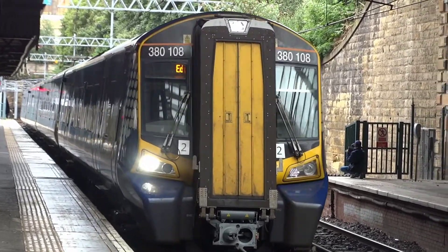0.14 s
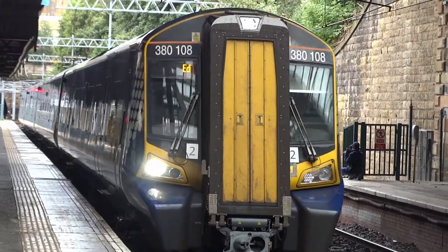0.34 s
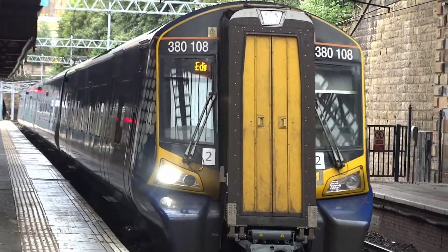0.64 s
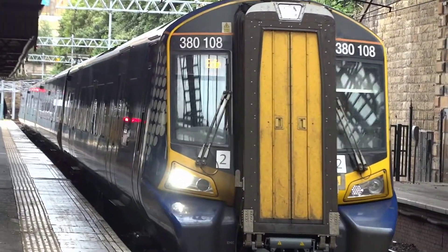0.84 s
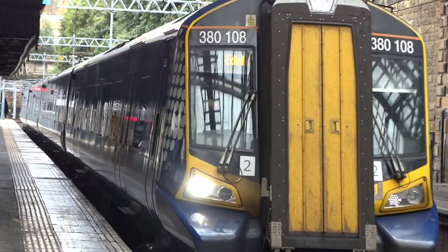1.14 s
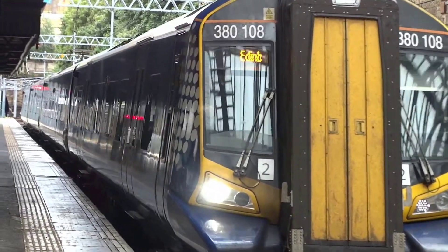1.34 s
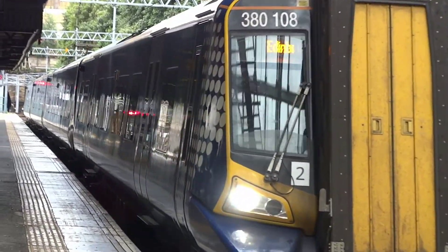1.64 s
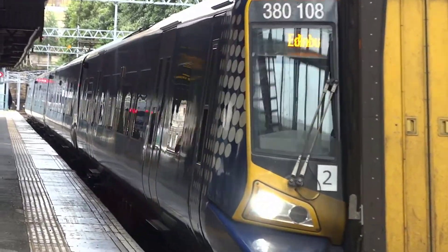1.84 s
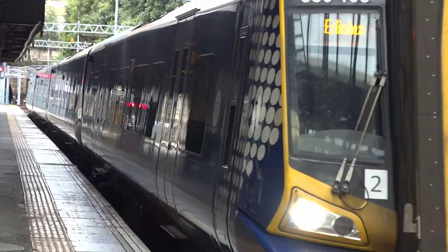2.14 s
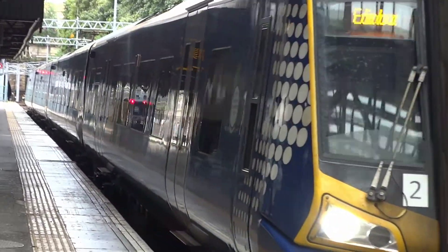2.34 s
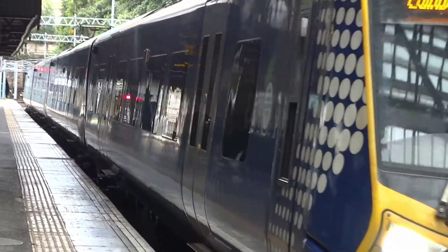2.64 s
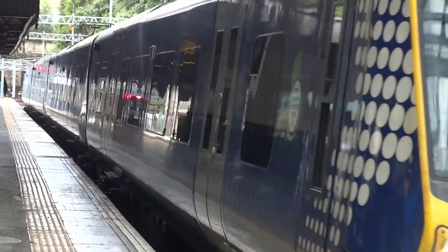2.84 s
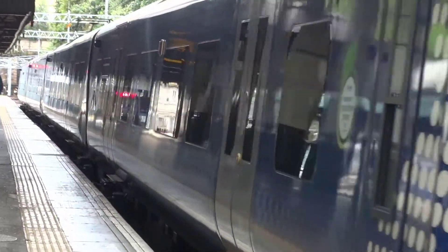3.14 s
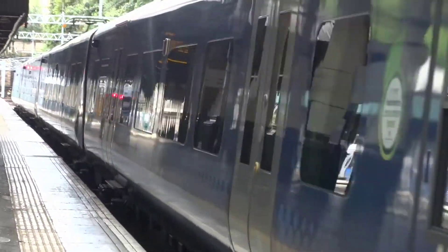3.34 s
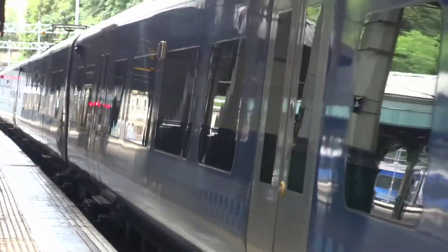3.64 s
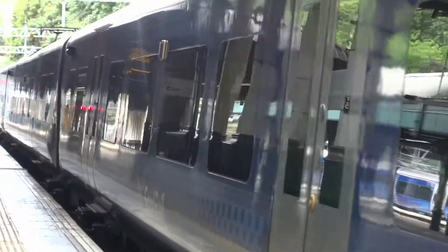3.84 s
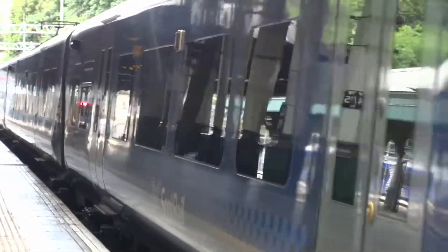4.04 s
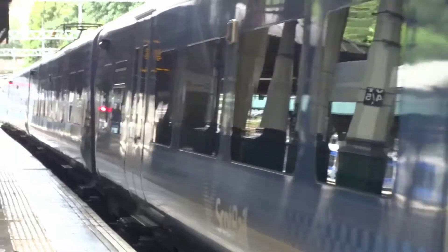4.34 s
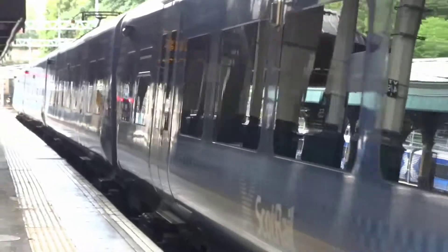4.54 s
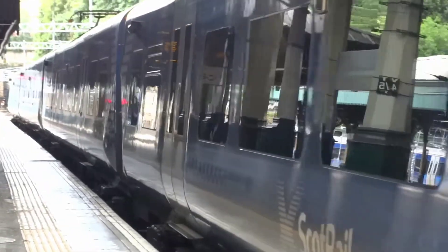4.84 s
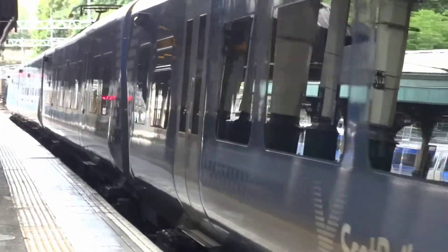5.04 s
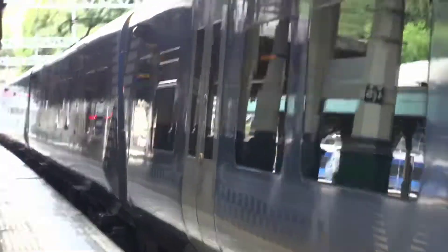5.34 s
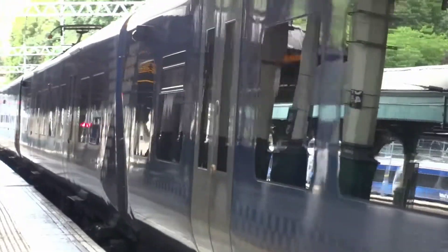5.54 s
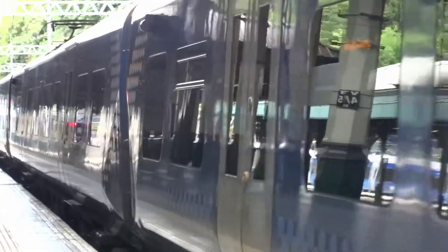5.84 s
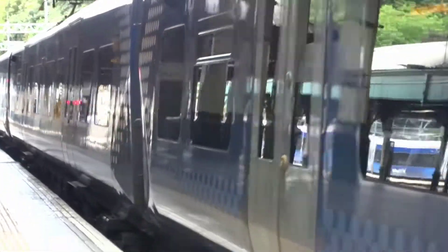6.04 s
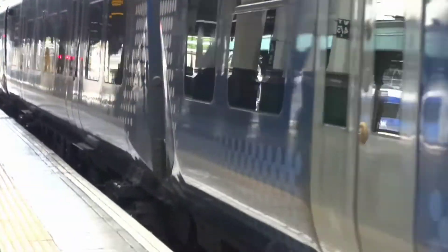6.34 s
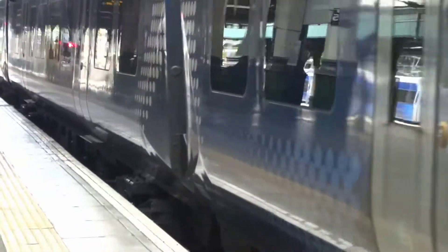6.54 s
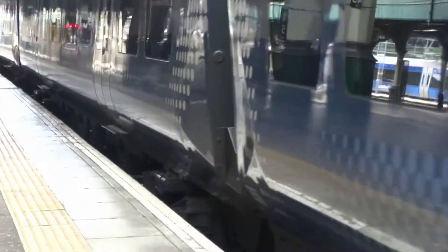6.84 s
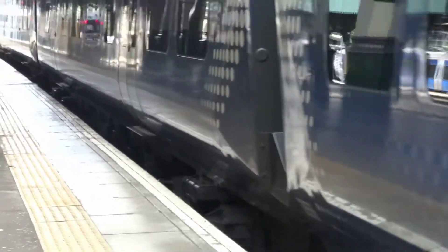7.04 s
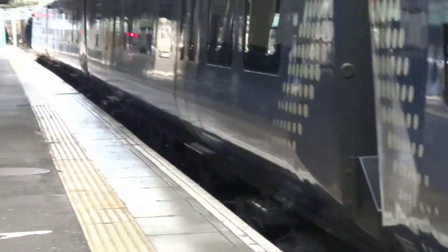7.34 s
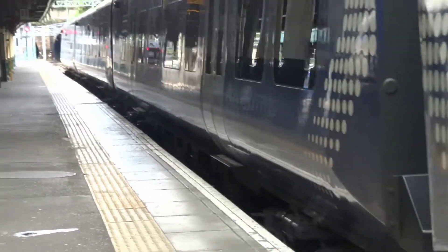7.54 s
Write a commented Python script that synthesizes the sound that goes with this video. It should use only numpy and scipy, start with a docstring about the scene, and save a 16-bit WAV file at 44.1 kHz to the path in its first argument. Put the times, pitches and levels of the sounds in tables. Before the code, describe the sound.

An electric train rolls slowly past close by, wheels roaring and hissing, with a fading electrical whine, sharp air bursts and wheel thuds on rail joints.

```python
"""An electric train rolls slowly past, close by: its wheels roar and hiss on the rails, made from coloured noise.
The converter under the leading car whines and fades; gears and motors sing, as bands of noise and blurred tones.
Brake valves vent bursts of noise, and wheels thud on rail joints as short rings; fans hum and faint treble flickers.
An automatic gain control turns loud moments down and partly creeps back."""
import sys
import numpy as np
from scipy import signal
from scipy.fft import rfft, irfft, next_fast_len
from scipy.io import wavfile
from scipy.ndimage import uniform_filter1d, map_coordinates

SR = 44100
rng = np.random.default_rng(int(sys.argv[2]) if len(sys.argv) > 2 else 0)


def unload_audio(sound):
    """Save the sound as a 16-bit wav file, at the path given as the first command line argument."""
    columns = np.transpose(np.atleast_2d(sound))
    # keep every value between -1 and 1, then stretch to whole-number steps
    steps = np.round(np.clip(columns, -1, 1) * 32767)
    wavfile.write(sys.argv[1], SR, steps.astype(np.int16))


N = 339129  # length in samples

# All levels are those before the gain control in record().
# rolling noise as cars and bogies go by: t/s, wheel rumble level/dB, rail hiss level/dB
ROLLING_LEVELS = [(0, -19.5, -17.5), (.6, -21.5, -17.5), (1.1, -22.5, -18.5), (1.4, -17.5, -15.5),
                  (1.5, -17.5, -13), (1.7, -22.5, -15.5), (2.1, -20.5, -13.5), (2.8, -19.5, -16),
                  (3.5, -19, -15), (4.2, -16, -17.5), (4.65, -15.5, -16.5), (4.85, -13.5, -17.5),
                  (5.05, -18.5, -19), (5.6, -20.5, -20.5), (6.4, -21, -20.5), (6.9, -17, -19),
                  (7.3, -17, -17.5), (7.69, -15, -17)]


def rolling():
    """Rough rails shake the wheels and car body into a low rumble, and the rails into a hiss."""
    # wheels and car body: f/Hz, relative level/dB
    rumble_colour = [(18, -46), (35, -6), (60, -5.5), (140, -4.5), (200, -0.5), (340, -0.5), (470, -3.5),
                     (530, -10.5), (800, -7.5), (1300, -26), (2500, -120)]
    # rails: f/Hz, relative level/dB
    hiss_colour = [(300, -23.5), (500, -4.5), (900, -1), (1400, -3.5), (1600, -8), (2400, -13),
                   (3200, -16.5), (4200, -16.5), (4700, -19.5), (6800, -21), (7100, -73), (7600, -120)]
    # the rumble's strongest notes: f/Hz, width/Hz, relative level/dB
    drone_notes = [(256, 61, 3), (348, 82, 1.5)]
    # how strong those notes are: t/s, level/dB
    drone_level = [(1.6, -36), (2.2, -24), (2.9, -32), (3.6, -20), (4, -30), (4.4, -25), (4.8, -29),
                   (5.1, -27), (5.9, -19.5), (6.5, -25), (7.69, -22)]
    sway_db, surge_db = 0.55, 1.3
    rumble_db, hiss_db = curves(ROLLING_LEVELS)
    sway = sway_db * wobble(5)  # the wheel load varies, in rumble and hiss alike
    surge = surge_db * wobble(16)  # uneven swells of the rumble alone
    rumble = amp(rumble_db + sway + surge) * rush(coloured(rumble_colour), patchy_db=1.0)
    drone = amp(curves(drone_level)[0]) * rush(bands(drone_notes), patchy_db=2.0)
    hiss = amp(hiss_db + sway) * rush(coloured(hiss_colour), patchy_db=0.85)
    return rumble + drone + hiss


def converter():
    """The converter roars and whines in narrow bands of noise while its fan blows air."""
    # roar: f/Hz, width/Hz, relative level/dB
    roar_bands = [(240, 147, 2), (616, 110, -4.5), (4050, 480, -14)]
    # close-set strands of the whine: f/Hz, width/Hz, relative level/dB
    whine_bands = [(1275, 36, -6), (1298, 47, -6), (1358, 120, -4.5)]
    # upper band: f/Hz, width/Hz, relative level/dB
    overtone_bands = [(2625, 190, -5), (2838, 270, 1.5)]
    # air through the fan: f/Hz, relative level/dB
    cooling_colour = [(4300, -30), (4800, -1), (6000, -3), (7000, 4), (7600, -28), (7800, -60)]
    steady_db, passed_s, recede_db_per_s = -19.5, 3.33, 13.5  # fades once its car has passed
    cooling_db, whine_db, overtone_db = -14.5, -1.5, -7  # over the roar
    whine_grows_db_per_s = 0.08
    overtone_lag_s = 0.08  # the upper band starts to fade a little later
    beat_hz, beat_depth_db = 27, 1.3
    t = clock()
    roar_db = steady_db - recede_db_per_s * np.maximum(t - passed_s, 0)
    roar = amp(roar_db) * rush(bands(roar_bands), patchy_db=1.0)
    cooling = amp(roar_db + cooling_db) * rush(coloured(cooling_colour), patchy_db=-1.0)

    # the whine flutters unevenly
    beat_phase = 2 * np.pi * beat_hz * t + 1.5 * wobble(4)
    beat_db = beat_depth_db * np.sin(beat_phase) + 0.8 * wobble(7)
    whine_level_db = roar_db + beat_db + whine_db + whine_grows_db_per_s * t
    whine = amp(whine_level_db) * rush(bands(whine_bands), patchy_db=0.0)
    firm_strand = fuzzy(1295, roar_db + whine_db - 10, smear_rate=35, steady=0.6)

    late_s = np.maximum(t - passed_s - overtone_lag_s, 0)
    late_db = steady_db + overtone_db - recede_db_per_s * late_s
    overtone = amp(late_db + 0.5 * beat_db) * rush(bands(overtone_bands), patchy_db=0.5)
    return roar + cooling + whine + firm_strand + overtone


def gears():
    """Turning gears sing in narrow bands of noise, with one clearer strand and the note of meshing teeth."""
    # gear whine: f/Hz, width/Hz, relative level/dB
    whine_bands = [(3614, 220, 0), (3733, 45, 1.5), (3940, 44, 2.5), (4030, 45, -6)]
    mesh_hz, mesh_sag_hz_per_s, mesh_db = 1473, 4, -2  # sinks as the train slows; level over the gear whine
    level_db = gear_level()
    whine = amp(level_db) * rush(bands(whine_bands), patchy_db=0.7)
    strand = fuzzy(3742, level_db - 6.5 + 1.8 * wobble(3), smear_rate=40, steady=0.5)
    mesh = fuzzy(mesh_hz - mesh_sag_hz_per_s * clock(), level_db + mesh_db, smear_rate=24, steady=1.2)
    return whine + strand + mesh


def gear_level():
    """Level in dB of the gears, which grows as the motor bogie nears and swells with the rail hiss."""
    start_db, nearing_db_per_s = -33.5, 1.19
    follows = 0.96  # share of the hiss's swells
    close_s, close_db_per_s = 7.64, 7  # extra growth as the bogie draws level
    hiss_db = curves(ROLLING_LEVELS)[1]
    nearing = nearing_db_per_s * clock() + close_db_per_s * np.maximum(clock() - close_s, 0)
    return start_db + nearing + follows * (hiss_db - hiss_db.mean())


def motor():
    """The motor's tone sinks and fades as the train slows."""
    start_hz, sag_hz_per_s = 657, 33
    start_db, fade_db_per_s = -26, 6
    t = clock()
    return fuzzy(start_hz - sag_hz_per_s * t, start_db - fade_db_per_s * t, smear_rate=24, steady=1.3)


def brake_squeal():
    """The brake disc squeals as a blurred tone, which grows faster once the pads bite."""
    squeal_hz, over_gears_db = 5820, -16.5
    bite_s, bite_db_per_s = 6.5, 7
    level_db = gear_level() + over_gears_db + bite_db_per_s * np.maximum(clock() - bite_s, 0)
    return fuzzy(squeal_hz, level_db, smear_rate=140, steady=0.3)


def puffs():
    """Brake valves let out short rushes of compressed air, each with a burst on opening."""
    # short vents: t/s, hold/s, level/dB
    openings = [(0.28, 0.13, -25.5), (0.527, 0.19, -15.5)]
    # opening burst: f/Hz, relative level/dB
    pop_colour = [(1500, -16), (3000, -6), (5800, -3), (8000, 0), (10500, -17), (12000, -40)]
    # escaping air: f/Hz, relative level/dB
    air_colour = [(900, -27), (1700, -6), (2400, -5), (4500, -9.5), (7400, -15), (7800, -12), (8100, -50),
                  (10800, -62), (11500, -32), (15000, -60)]
    attack_s, fall_db_per_s = 0.0046, 102
    sag_db_per_s = 12  # the pressure drops all along
    pop_db, pop_fall_db_per_s = -3, 350  # level over the puff
    pop_gain, air_gain = 0, 0
    for start, hold, db in openings:
        sag = amp(-sag_db_per_s * (clock() - start))
        pop_gain = pop_gain + swell(start, 0, db + pop_db, attack_s, pop_fall_db_per_s)
        air_gain = air_gain + swell(start, hold, db, attack_s, fall_db_per_s) * sag
    pop = pop_gain * rush(coloured(pop_colour), patchy_db=3)
    flutter = amp(0.32 * wobble(37.6))
    return pop + air_gain * flutter * rush(coloured(air_colour), patchy_db=1.0)


def long_vent():
    """A valve cracks open with a rising chirp; the air then hisses and whistles in its nozzle."""
    # the vent chokes, then empties: t/s, hold/s, level/dB, fall/(dB per s)
    spurts = [(1.592, 0.016, 2, 300), (1.651, 0.025, -0.5, 54)]
    # jet: f/Hz, relative level/dB
    jet_colour = [(3000, -22), (4400, -14), (6300, -9), (7400, -2.5), (7850, 6), (8250, 2), (8450, -30),
                  (9000, -65)]
    # sharpest hiss: f/Hz, relative level/dB
    top_colour = [(8200, -40), (8400, -2), (8900, -1), (9100, -34), (11000, -30), (12500, -26),
                  (14500, -29), (15200, -64)]
    # f/Hz, left-right likeness (1 = the same)
    vent_alike = [(6000, 1), (7500, 0.97), (8400, 0.26)]
    attack_s = 0.032
    shut_s, shut_db_per_s = 2.15, 154  # the valve closes
    chirp_s, chirp_hold_s, chirp_db = 1.565, 0.03, -27.5
    chirp_hz, chirp_rise_hz_per_s = 6300, 9000
    t = clock()
    rising_hz = chirp_hz + chirp_rise_hz_per_s * np.clip(t - chirp_s, 0, 0.1)
    chirp_gain = swell(chirp_s, chirp_hold_s, chirp_db, 0.0087, 3000)
    chirp = chirp_gain * fuzzy(rising_hz, 0, smear_rate=290, steady=0.28)

    flow = sum(swell(start, hold, db, attack_s, fall) for start, hold, db, fall in spurts)
    flow = flow * amp(-shut_db_per_s * np.maximum(t - shut_s, 0))
    flow = flow * amp(1.0 * wobble(30))  # the jet flutters
    whistle = fuzzy(7850, -8.0, smear_rate=80, steady=0.8)
    jet = flow * (rush(coloured(jet_colour), 0.52, vent_alike) + whistle)
    # the power makes the sharpest hiss die first as the pressure falls
    top = amp(-4.5) * flow ** 2.4 * rush(coloured(top_colour), 7.3, vent_alike)
    return chirp + jet + top


def thuds():
    """Wheels strike rail joints: bogie frame and rail ring at new strengths, and the wheel bounces once."""
    # wheels on joints: t/s, blow level before the cut below/dB, rail clank under bogie ring/dB
    joints = [(4.383, -5, -11), (4.707, -15, -20), (4.818, 1.5, -20), (5.2, 5.5, -6), (5.483, -5.5, -8),
              (5.75, 5, -8), (6.901, -2, -6), (7.249, -0.5, -7), (7.58, -6, -13)]
    # bogie frame, typical values: f/Hz, level/dB, time to fade by 60 dB/s
    bogie_modes = [(227, 8, 0.057), (285, 0.5, 0.11), (338, 6.5, 0.072), (435, -1.5, 0.062)]
    # rail, typical values: f/Hz, level/dB, time to fade by 60 dB/s
    rail_modes = [(910, 11, 0.051), (1090, -7, 0.27), (1400, -16, 0.17)]
    knock_db, knock_t60_s = -7, 0.068  # dull noise of the blow itself
    out, t = np.zeros(N + SR), np.arange(SR // 4) / SR

    def ring(modes):
        """Fading sine tones whose level and pitch vary a little from blow to blow."""
        total = 0
        for hz, db, t60 in modes:
            fading = amp(db + rng.normal(0, 1.5) - 60 * t / t60)
            total = total + fading * np.sin(2 * np.pi * hz * rng.normal(1, 0.03) * t)
        return total

    for start, db, clank_db in joints:
        for late_s, cut_db in [(0, -10), (0.016, -12)]:  # first blow, then the bounce
            dull = np.convolve(rng.standard_normal(len(t)), np.hanning(24), 'same')
            knock = amp(knock_db - 60 * t / knock_t60_s) * unit(dull)
            soft_start = 1 - np.exp(-t / 0.003)
            blow = (knock + ring(bogie_modes) + amp(clank_db) * ring(rail_modes)) * soft_start
            out[round((start + late_s) * SR):][:len(t)] += amp(db + cut_db) * blow
    right = np.pad(out, (round(0.00012 * SR), 0))  # later: the joint lies a little to the left
    return np.array([out[:N], right[:N]])


def hum():
    """Fans hum in blurred low tones that swell and sink; one of them drops slightly in pitch."""
    # fans: starting f/Hz, smear rate/(knots per s), pitch sag/(Hz per s), steadiness (sine against smear)
    tones = [(54, 9, 0, 1.6), (118.3, 18, 1.4, 1.3), (481, 9.7, 0, 3)]
    # t/s, level of first tone/dB, of second tone/dB, of third tone/dB
    tone_levels = [(0, -30, -32, -30), (.9, -38, -28.5, -44), (1.5, -29, -20, -30), (1.9, -28, -21.5, -27),
                   (2.5, -25.5, -24, -28), (3.5, -34, -21.5, -29.5), (4, -45, -20.5, -32),
                   (4.5, -28.5, -30.5, -36), (5.8, -35, -31, -32.5), (7, -27.5, -28.5, -30.5),
                   (7.69, -36, -27, -31)]
    total = 0
    for (hz, smear_rate, sag, steady), db in zip(tones, curves(tone_levels)):
        total = total + fuzzy(hz - sag * clock(), db, smear_rate, steady)
    return total


def faint_treble():
    """Thin treble flickers as very patchy noise, with a fainter layer above it."""
    # flickering treble: f/Hz, relative level/dB
    flicker_colour = [(6800, -65), (7000, 11.5), (7800, -1.5), (8600, -0.5), (9100, -12.5), (10500, -27),
                      (10900, -70)]
    # faint top: f/Hz, relative level/dB
    top_colour = [(10600, -46), (11000, 0), (11600, -7.5), (12500, -7.5), (13900, -24), (15400, -54)]
    # t/s, flickering treble level/dB, faint top level/dB
    levels = [(0, -32.5, -54), (1.2, -33.5, -49), (2.3, -30, -52), (3.2, -31.5, -56.5), (4, -36.5, -55.5),
              (4.8, -35.5, -51.5), (5.5, -41, -57), (6.5, -43.5, -55), (7.2, -31, -49), (7.69, -31.5, -44)]
    flicker_db, top_db = curves(levels)
    flicker = amp(flicker_db) * rush(coloured(flicker_colour), patchy_db=19)
    return flicker + amp(top_db) * rush(coloured(top_colour), 6.3, [(11000, 0.13)])


def rush(gain, patchy_db, alike=None):
    """Stereo noise of rms 1, coloured by gain, with random louder and softer patches in time and pitch."""
    # usual stereo image: f/Hz, left-right likeness (1 = the same)
    usual_alike = [(60, 1), (150, 1), (380, 0.98), (950, 0.92), (2400, 0.91), (4500, 0.98), (6800, 0.92),
                   (7300, 0.026), (15000, 0.057)]
    likeness = usual_alike if alike is None else alike
    z = signal.stft(rng.standard_normal((2, N)), nperseg=512)[2]
    field = uniform_filter1d(rng.standard_normal(z.shape[1:]), size=7, axis=0)
    field = uniform_filter1d(field, size=9, axis=1)
    patches = amp(patchy_db * np.clip(unit(field), -3, 2))
    pair = signal.istft(z * patches, nperseg=512)[1][:, :N]

    def mid_side_gain(hz):
        """Share the noise between middle and sides so that left and right are as alike as asked."""
        turn = np.arccos(np.clip(along(likeness, hz), -1, 1)) / 2
        return gain(hz) * [np.cos(turn), np.sin(turn)]

    mid, side = filtered(pair, mid_side_gain)
    return unit(np.array([mid + side, mid - side]))


def fuzzy(hz, db, smear_rate, steady):
    """A stereo tone on a pitch curve: a sine of strength steady plus slow noise, smear_rate knots a second."""
    smear = wobble(smear_rate) + 1j * wobble(smear_rate)
    side = 0.075 * (wobble(smear_rate) + 1j * wobble(smear_rate))
    turning = np.exp(2j * np.pi * np.cumsum(hz * np.ones(N)) / SR)
    return amp(db) * unit(np.real((steady + smear + [side, -side]) * turning))


def swell(start, hold, db, attack, fall_db_per_s):
    """Gain that rises, holds and dies away; times in s."""
    t = clock() - start
    return np.clip(t / attack, 0, 1) ** 2 * amp(db - fall_db_per_s * np.maximum(t - attack - hold, 0))


def wobble(rate):
    """A smooth random curve, rate knots a second."""
    knots = rng.standard_normal(int(N * rate / SR) + 4)
    return map_coordinates(knots, [np.arange(N) * rate / SR])


def coloured(spectrum):
    """Gain over frequency through (Hz, dB) points."""
    return lambda hz: amp(along(spectrum, hz))


def bands(modes):
    """Gain over frequency of bell-shaped (Hz, width in Hz, dB) resonances."""
    return lambda hz: sum(amp(db) / (1 + (2 * (hz - c) / w) ** 2) for c, w, db in modes)


def filtered(x, response):
    """x times a response of frequency."""
    m = next_fast_len(N + 8192)
    return irfft(rfft(x, m) * response(np.fft.rfftfreq(m, 1 / SR)), m)[..., :N]


def along(points, hz):
    """Read (Hz, value) points on a log frequency axis."""
    f, v = np.transpose(points)
    return np.interp(np.log(hz + 1), np.log(f + 1), v)


def curves(rows):
    """One value per sample for each column after the time."""
    s, *cols = np.transpose(rows)
    return [np.interp(clock(), s, c) for c in cols]


def clock():
    """Time of each sample in s."""
    return np.arange(N) / SR


def amp(db):
    """Gain of a level in dB."""
    return 10 ** (np.asarray(db) / 20)


def unit(x):
    """x at rms 1."""
    return x / np.sqrt(np.mean(x ** 2) + 1e-20)


def scene():
    """All sources added, from the train itself to the faint treble."""
    train = rolling() + converter() + gears() + motor() + brake_squeal()
    return train + puffs() + long_vent() + thuds() + hum() + faint_treble()


def record(dry):
    """Two ports of unlike tone and phase, a gain control, soft clipping and the band limit."""
    # f/Hz, left minus right level/dB
    lean = [(60, -1), (250, -1), (600, 0.6), (2000, 0)]
    # f/Hz, phase by which left leads/rad
    lead = [(40, 0), (340, 0.39), (3200, 0.1), (6800, 0)]
    ceiling_db, slow_share, creep_db_per_s = -11, 0.61, 2.68
    top_hz = 15550
    halves = [0.5, -0.5]  # left and right each take half of the difference

    def ports(hz):
        """Level and phase of the left and right port."""
        return amp(np.outer(halves, along(lean, hz))) * np.exp(1j * np.outer(halves, along(lead, hz)))

    x = filtered(dry, ports)
    power = uniform_filter1d(np.mean(x ** 2, axis=0), int(0.0082 * SR))
    level_db = 10 * np.log10(np.abs(power) + 1e-9)
    need_db = np.minimum(0, ceiling_db - level_db)  # cut that brings the level down to the ceiling
    creep_db = creep_db_per_s * clock()  # part of each cut is given back only slowly
    smooth_need_db = slow_share * uniform_filter1d(need_db, int(0.06 * SR))
    slow_db = np.minimum.accumulate(smooth_need_db - creep_db) + creep_db
    x = x * amp(uniform_filter1d(np.minimum(need_db, slow_db), int(0.016 * SR)))
    x = x / (1 + np.abs(x) ** 8) ** (1 / 8)  # soft clipping
    return filtered(x, lambda hz: hz < top_hz)


dry = scene()
out = record(dry)
unload_audio(out)
```